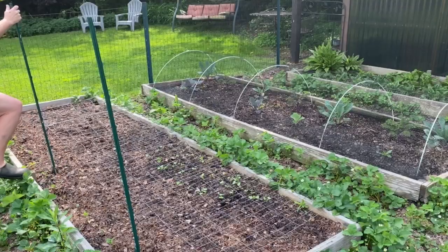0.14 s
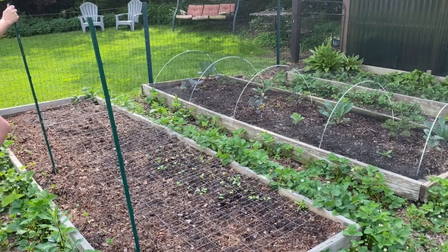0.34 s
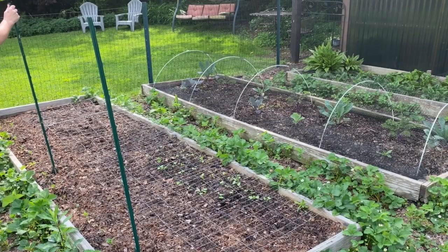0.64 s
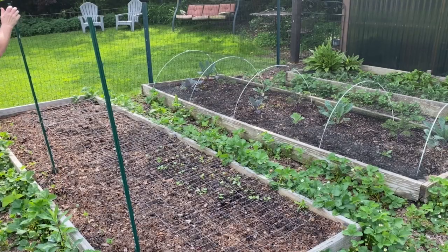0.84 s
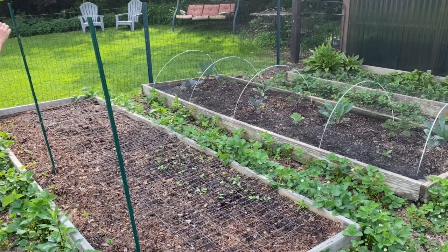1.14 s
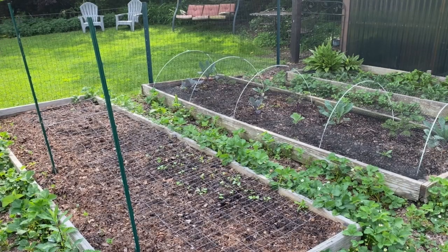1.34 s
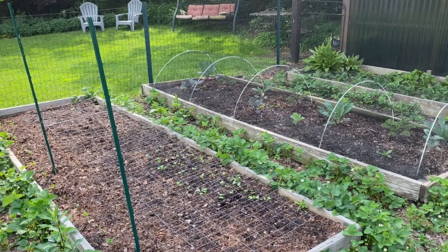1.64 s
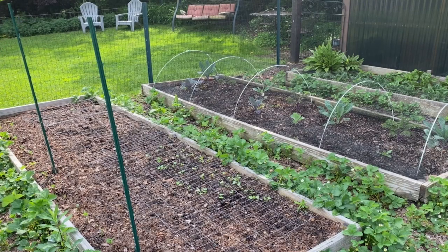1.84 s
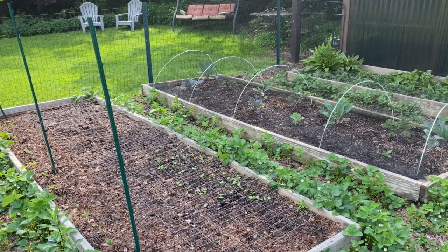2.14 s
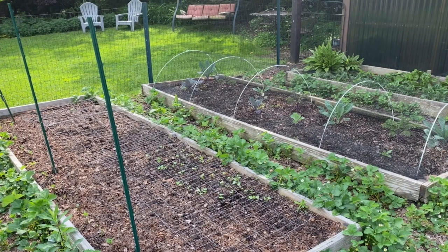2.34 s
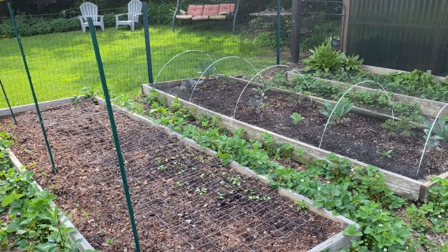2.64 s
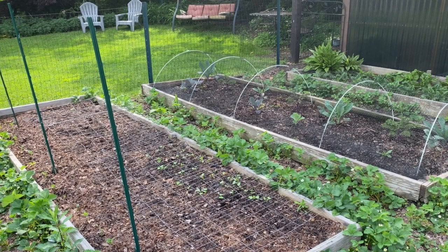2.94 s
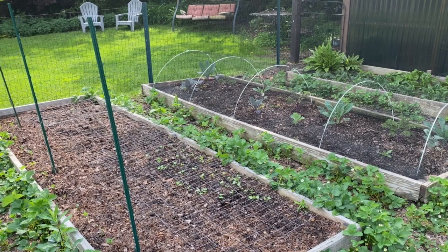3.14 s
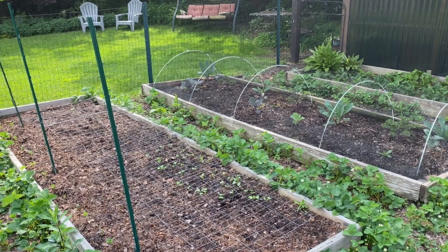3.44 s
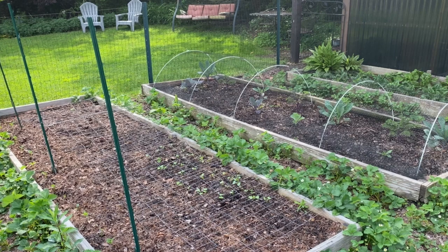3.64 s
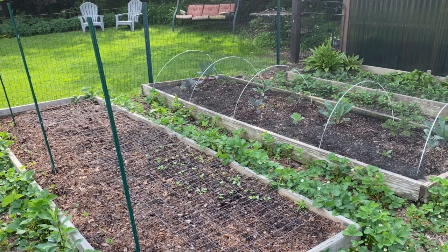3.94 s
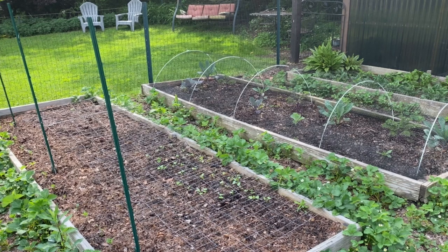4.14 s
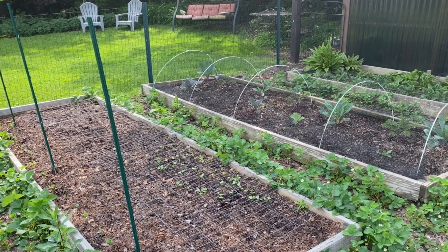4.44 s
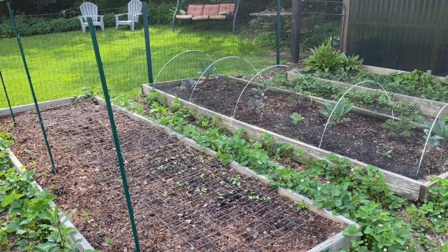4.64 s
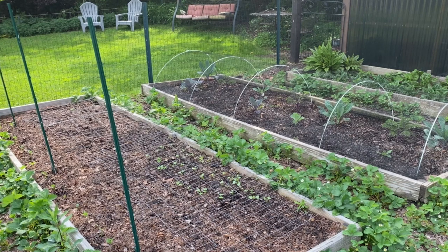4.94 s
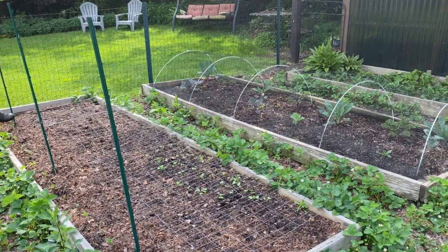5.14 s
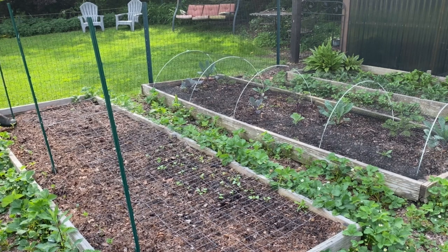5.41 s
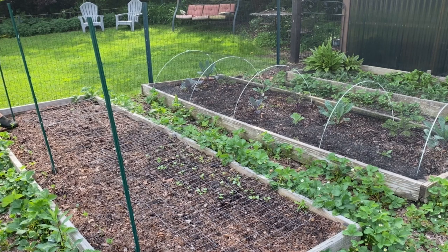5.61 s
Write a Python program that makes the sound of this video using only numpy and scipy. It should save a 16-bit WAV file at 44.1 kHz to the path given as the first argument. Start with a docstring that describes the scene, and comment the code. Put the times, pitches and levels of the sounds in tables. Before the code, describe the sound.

A deep steady drone fills a garden while wrens, sparrows and other songbirds chatter; a foot bumps timber softly near the start.

```python
"""Birds over a humming garden

A wren twitters and trills, a warbler rolls a phrase, sparrows chirp and a songbird whistles falling notes:
all gliding sines, each with a weak overtone and scattered echoes from trees and a shed wall.
A foot bumps a wooden bed edge (short puffs of noise); a faint grainy treble hiss (noise) comes and goes.
A machine hums low (wavering sines over rumble noise) in open air (broad noise); at 3.931 s a quick crossfade
swaps hum and air for another pair, the hum lower in pitch, and the hiss stops."""
import sys
import numpy as np
from scipy import signal
from scipy.fft import rfft, irfft, next_fast_len
from scipy.io import wavfile
from scipy.ndimage import uniform_filter1d, map_coordinates

SR = 44100
rng = np.random.default_rng(int(sys.argv[2]) if len(sys.argv) > 2 else 0)


def digitize_waveform(pressure):
    """Quantize a signal to 16-bit integers and store it at the path in sys.argv[1].

    Rows of a 2-D input are taken as channels; values are limited to [-1, 1].
    """
    field = np.atleast_2d(pressure).T
    bounded = np.clip(field, -1, 1)
    quanta = np.round(bounded * 32767).astype(np.int16)
    wavfile.write(sys.argv[1], SR, quanta)


N = 254607
CHANGE_S = 3.931  # the hum and air change, the treble hiss stops

# Wren's single notes: (time [s], syllable, pitch ratio, level before the perch gain [dB])
WREN_NOTES = [(0.59, "tick", 1.02, -30), (0.65, "tick", 0.99, -29.5), (.709, "slur", 1.01, -27.5),
              (0.778, "lift", 1.02, -37), (0.904, "nick", 1.02, -31), (0.997, "lift", 0.88, -28)]
# Its two-note seesaw: (time within the motif [s], syllable, relative level [dB])
SEESAW_MOTIF = [(0, "see", -3.5), (.012, "saw", 1)]
# Its two-note trill: (time within the motif [s], syllable, relative level [dB])
TRILL_MOTIF = [(0, "lead", -7.5), (.013, "drop", .5)]


def wren():
    """A seesaw that grows louder, a fast trill that softens, and single twitters, all from one syrinx."""
    seesaw = repeated(SEESAW_MOTIF, start_s=.074, period_s=.119, count=4, level_db=-37.0, grow_db=1.8)
    trill = repeated(TRILL_MOTIF, start_s=.9935, period_s=.0498, count=9, level_db=-26.0, grow_db=-0.38)
    notes = seesaw + trill + WREN_NOTES
    return amp(1.5) * bird(notes, pan_db=-1.5, lag_ms=.41, echo_db=-2.5, rough=0.012, overtone_db=-54.5)


# Warbler's accented notes: (time [s], syllable, pitch ratio, level before the perch gain [dB])
WARBLER_ACCENTS = [(1.556, "flick", 0.99, -27.5), (1.706, "nick", 0.9, -29), (1.853, "nick", .85, -35),
                   (2.158, "nick", 0.83, -34)]
# Its rolled motif: (time within the motif [s], syllable, relative level [dB])
ROLL_MOTIF = [(0, "buzz", -3), (.074, "dip", -1), (.103, "flick", 1.5)]


def warbler():
    """A rolled motif repeats at an even pace, sinking slightly in pitch, with accents among the repeats."""
    roll = repeated(ROLL_MOTIF, start_s=1.449, period_s=.1493, count=5, level_db=-32, grow_db=-0.17,
                    sag=0.0109)
    notes = roll + WARBLER_ACCENTS
    return amp(2.0) * bird(notes, pan_db=-5.0, lag_ms=.4, echo_db=-5.0, rough=0.024, overtone_db=-49)


# Near sparrow's notes: (time [s], syllable, pitch ratio, level before the perch gain [dB])
NEAR_SPARROW_NOTES = [(1.011, "squeal", 1.055, -33), (3.37, "cheep", 0.99, -28),
                      (3.931, "chip", 1.03, -24.5), (4.776, "hoop", 0.98, -53),
                      (5.271, "hoop", 0.97, -44.5), (5.306, "hoop", 1.01, -47), (5.551, "lift", 0.72, -36),
                      (5.56, "lift", .75, -33.5), (5.576, "drop", 1, -31.5)]


def near_sparrow():
    """Fairly dry calls, some with two voices sounding at once, among plain glides."""
    return amp(2.5) * bird(NEAR_SPARROW_NOTES, pan_db=4.0, lag_ms=.39, echo_db=-6.0, rough=0.013,
                           overtone_db=-55.5)


# Far sparrows' notes: (time [s], syllable, pitch ratio, level before echo and chirp shaping [dB])
FAR_SPARROW_NOTES = [(1.063, "chirp", 0.98, -24), (1.543, "chirp", 1.05, -28.5), (1.585, "drop", .8, -30),
                     (1.612, "drop", 0.49, -34), (1.967, "chirp", 1.1, -28.5), (2.016, "drop", .72, -31),
                     (2.032, "drop", 0.62, -34), (3.045, "upstroke", 1.05, -33),
                     (3.069, "downstroke", 1, -29.5), (3.106, "tail", 1, -32.5),
                     (3.122, "dip", 1.02, -37.5), (4.281, "chirp", 1.02, -26.5),
                     (4.347, "upstroke", 0.75, -33), (4.919, "upstroke", .95, -36),
                     (4.941, "crown", .92, -31), (4.955, "drop", .76, -39), (4.96, "upstroke", 1.03, -32),
                     (4.969, "upstroke", .88, -31), (4.978, "downstroke", .95, -30),
                     (5.631, "chirp", 1.05, -27), (5.741, "chirp", 1.03, -25)]


def far_sparrows():
    """Chirps of four strokes with a clear overtone, and loose single strokes."""
    return bird(strokes(FAR_SPARROW_NOTES), pan_db=4.0, lag_ms=-.05, echo_db=-4.0, rough=0.015,
                overtone_db=-25.0)


# The songbird's motif: (time within the motif [s], syllable, relative level [dB])
WHISTLE_MOTIF = [(0, "swoop", -1), (.134, "hold", -3)]


def whistling_songbird():
    """Three steady whistles that fall and hold, each louder; the weak overtone is the fourth harmonic."""
    whistles = repeated(WHISTLE_MOTIF, start_s=4.846, period_s=.4052, count=3, level_db=-26, grow_db=1.3)
    return bird(whistles, pan_db=-3.0, lag_ms=0.45, echo_db=-3.5, rough=0.0012, overtone_db=-32.0, order=4)


# Songbird on the left: (time [s], syllable, pitch ratio, level before echo and panning [dB])
LEFT_SINGER_NOTES = [(4.195, "arch", 0.97, -36), (4.231, "dip", .88, -35), (4.255, "crest", 0.96, -33),
                     (4.357, "crest", .89, -35.5), (4.795, "fall", 0.99, -37.5),
                     (4.861, "plunge", 0.97, -38)]


def left_singer():
    """A short phrase of clear, nearly pure glides, earlier and louder on the left."""
    return bird(LEFT_SINGER_NOTES, pan_db=8.5, lag_ms=-0.33, echo_db=-7.5, rough=.005, overtone_db=-36)


# One clean peep: (time [s], syllable, pitch ratio, level before echo and panning [dB])
PEEP_NOTE = [(2.155, "peep", 1, -30)]


def close_peep():
    """One falling, almost pure tone from close by, with little echo."""
    return bird(PEEP_NOTE, pan_db=-5.0, lag_ms=.4, echo_db=-7, rough=.002, overtone_db=-50)


# Sparrows deep in the trees: (time [s], syllable, pitch ratio, level before the perch gain [dB])
HIDDEN_SPARROW_NOTES = [(1.985, "chirp", 0.87, -38), (3.095, "chirp", 0.8, -41.5),
                        (3.698, "buzz", 1.58, -41), (3.722, "buzz", 1.2, -42), (3.935, "chip", 0.79, -27),
                        (4.3, "chirp", 1.2, -47.5), (4.905, "chirp", 1.2, -39.5),
                        (5.405, "chirp", 0.69, -40.5), (5.61, "chirp", 1.22, -43)]


def hidden_sparrows():
    """Hoarse calls whose scattered sound outweighs the direct sound."""
    return amp(3.0) * bird(strokes(HIDDEN_SPARROW_NOTES), pan_db=11, lag_ms=.1, echo_db=7.0, rough=0.052,
                           overtone_db=-20.5)


# Distant birds' notes: (time [s], syllable, pitch ratio, level before the perch gain [dB])
DISTANT_NOTES = [(.012, "fall", 1.13, -41.5), (.022, "pip", 1.04, -39.5), (.05, "fall", 1.12, -41),
                 (.078, "fall", 1.01, -43.5), (.064, "bow", 0.99, -45), (.248, "pip", 0.96, -40.5),
                 (.272, "sigh", 1, -42), (.395, "buzz", 2, -39.5), (.505, "peep", 0.59, -42.5),
                 (.53, "buzz", 2.02, -41.5), (.55, "fall", 1.04, -42.5), (.712, "rise", 0.98, -43.5),
                 (.847, "upstroke", 0.7, -37), (.872, "fall", 1.46, -40.5), (.925, "pip", 0.94, -40.5),
                 (1.04, "hold", 0.88, -42.5), (1.122, "scoop", 1.1, -40), (1.215, "quaver", 0.99, -43),
                 (3.14, "pip", 1.12, -48.5), (3.662, "fall", 2.02, -44.5), (3.98, "pip", 0.99, -47),
                 (4.078, "fall", 1.3, -47), (4.233, "slur", 0.86, -43.5), (4.248, "fall", 2, -44),
                 (4.26, "pip", 1.56, -50.5), (4.63, "crest", 1.01, -45.5), (4.675, "sigh", 0.79, -49.5),
                 (4.83, "arch", 1.15, -48), (5.405, "buzz", 1.1, -47), (5.44, "buzz", 1.1, -49),
                 (5.675, "hold", 1.075, -37)]
# A thin call: (time within the motif [s], syllable, relative level [dB])
THIN_MOTIF = [(0.0048, "hold", 0)]


def distant_birds():
    """Soft notes washed in echo, and a thin high call repeated at an even pace."""
    thin = repeated(THIN_MOTIF, start_s=1.41, period_s=.192, count=4, level_db=-51, grow_db=0.0,
                    ratio=2.8, sag=0.013)
    return amp(4.5) * bird(DISTANT_NOTES + thin, pan_db=-0.5, lag_ms=0.029, echo_db=2.0, rough=0.013,
                           overtone_db=-31)


def birds():
    """Sum of all perches."""
    return (wren() + warbler() + near_sparrow() + far_sparrows() + hidden_sparrows()
            + whistling_songbird() + left_singer() + close_peep() + distant_birds())


def repeated(motif, start_s, period_s, count, level_db, grow_db, ratio=1, sag=0):
    """A motif sung at an even pace; each repeat changes by grow_db and sinks by the share sag of its pitch."""
    notes = []
    for k in range(count):
        for s, name, db in motif:
            time_s = start_s + k * period_s + s
            notes.append((time_s, name, ratio * (1 - sag * k), level_db + grow_db * k + db))
    return notes


# Strokes of a sparrow's chirp: (time within the chirp [s], syllable, relative level [dB])
CHIRP_STROKES = [(0, "upstroke", -2.5), (.008, "crown", -5), (.025, "downstroke", -0.5),
                 (.06, "tail", -7.5)]


def strokes(notes):
    """Each chirp is sung as four quick strokes; other notes stay whole."""
    whole_note_offset = (0.0005, 0.0055)  # (s, dB)
    sung = []
    for s, name, ratio, db in notes:
        parts = CHIRP_STROKES if name == "chirp" else [(whole_note_offset[0], name, whole_note_offset[1])]
        sung += [(s + after_s, part, ratio, db + part_db) for after_s, part, part_db in parts]
    return sung


def bird(notes, pan_db, lag_ms, echo_db, rough, overtone_db, order=2):
    """One perch: each note arrives directly, lag_ms later on the left, and by its own scattered paths."""
    out = np.zeros((2, N))
    direct = 1 / np.sqrt(1 + amp(echo_db) ** 2)  # the more echo, the less comes straight
    for s, name, ratio, db in notes:
        note = direct * amp(db) * syllable(name, ratio, rough, overtone_db, order)
        left, right = panned(note, pan_db)
        add(out[0], s + lag_ms / 1000, left)
        add(out[1], s, right)
        add(out, s, amp(echo_db) * echoes(note))
    return out


# Quick vibrato by syllable: (rate [Hz], depth [share of the pitch])
VIBRATO_BY_SYLLABLE = {"buzz": (103.3, 0.065), "crown": (160, 0.032), "downstroke": (95, 0.054),
                       "tail": (100, 0.087), "quaver": (23.9, 0.035)}


def syllable(name, ratio, rough, overtone_db, order):
    """The syrinx sounds a gliding sine with one weak overtone; pitch and strength quiver with roughness."""
    if name == "swoop":
        pitch, strength = swoop()
    elif name in CALL_PITCH:
        pitch, strength = call(name)
    else:
        pitch, strength = glide(name)
    t = np.arange(len(pitch)) / SR
    pitch = ratio * pitch * (1 + rough * wobble(507.5, size=len(t)))
    if name in VIBRATO_BY_SYLLABLE:
        rate_hz, depth = VIBRATO_BY_SYLLABLE[name]
        pitch = pitch * (1 + depth * np.sin(2 * np.pi * rate_hz * t))
    phase = 2 * np.pi * np.cumsum(pitch) / SR
    tone = np.sin(phase) + amp(overtone_db) * np.sin(order * phase)
    if name in CALL_VOICING:  # the other side of the syrinx sings along, 1645 Hz higher
        tone = tone + amp(CALL_VOICING[name][-1]) * np.sin(phase + 2 * np.pi * 1645 * t)
    quiver = amp(60 * rough * wobble(300, size=len(t)))
    return strength * quiver * tone


# Plain syllables before the pitch ratio:
# (length [s], start [Hz], middle [Hz], end [Hz], loudest moment [share of the length])
GLIDE_SHAPES = { "see": (.02, 7300, 6800, 6250, .4), "saw": (.022, 4550, 5050, 5800, .7),
                "lead": (.015, 5000, 5750, 6850, .5), "drop": (.013, 6700, 4850, 3650, .5),
                "nick": (.015, 4250, 4650, 5250, .45), "tick": (.013, 5700, 4650, 4650, .5),
                "hoop": (.04, 4400, 5500, 4450, .45), "plunge": (.024, 3150, 2300, 2100, .35),
                "scoop": (.04, 2100, 2080, 2450, .4), "quaver": (.15, 2860, 2810, 2620, .45),
                "slur": (0.021, 7100, 5200, 4450, 0.14), "lift": (0.032, 6500, 7300, 7500, 0.23),
                "buzz": (0.045, 2570, 2670, 2390, 0.53), "dip": (.016, 3450, 2950, 2750, .4),
                "flick": (.028, 3600, 3950, 3950, .35), "hold": (0.068, 2530, 2605, 2540, 0.38),
                "pip": (.045, 4320, 4240, 4210, .35), "crest": (.062, 2270, 2410, 2330, .5),
                "bow": (.095, 2780, 3110, 2720, .6), "fall": (.045, 2340, 2230, 2120, .5),
                "peep": (.03, 5400, 5260, 5080, .4), "upstroke": (.011, 3250, 4150, 4950, .45),
                "crown": (.02, 4700, 4850, 4800, .4), "downstroke": (.023, 4550, 3880, 3950, .4),
                "tail": (.024, 3150, 3650, 3050, .45), "arch": (.054, 2250, 2860, 2480, .62),
                "sigh": (.115, 3050, 2840, 2720, .55), "rise": (.11, 2500, 2780, 3350, .8), }


def glide(name):
    """A plain syllable bends through three pitches while it swells and fades."""
    length, start_hz, middle_hz, end_hz, loudest = GLIDE_SHAPES[name]
    u = np.linspace(0, 1, int(length * SR))
    bend = np.polyfit([0, .5, 1], [start_hz, middle_hz, end_hz], 2)
    return np.polyval(bend, u), swell(length, loudest)


# Pitch of the two-voiced calls before smoothing and pitch ratio: (time after the start [s], pitch [Hz])
CALL_PITCH = { "cheep": [(0, 1800), (.007, 2450), (.014, 5400), (.02, 6700), (.04, 7100), (.048, 5450),
              (.057, 5200), (.068, 6400), (.081, 4650), (.089, 2300), (.096, 1950)], "squeal": [(0, 5600),
              (.006, 6650), (.022, 7350), (.028, 6150), (.04, 6700), (.052, 6300)], "chip": [(0, 5400),
              (.004, 5530), (.009, 6370), (.015, 5050), (.03, 3540)], }
# Voicing of those calls: (throat resonance [Hz], fade [dB/s], time between strokes [s],
# dip between strokes [dB], second voice [dB])
CALL_VOICING = { "cheep": (5400, -35, .027, 7, -7), "squeal": (6700, 0, .024, 3, 0),
                "chip": (5300, 200, .013, 4, -9), }


def call(name):
    """A call is pushed out in strokes and loses level as its pitch leaves the throat's resonance."""
    throat_db_per_oct, edge_s = 12, .001
    s, hz = np.transpose(CALL_PITCH[name])
    throat_hz, fade_db_per_s, stroke_s, dip_db, _ = CALL_VOICING[name]
    t = np.arange(int(s[-1] * SR)) / SR
    pitch = uniform_filter1d(np.interp(t, s, hz), size=130)
    edges = np.clip(np.minimum(t, t[-1] - t) / edge_s, 0, 1)
    effort_db = -fade_db_per_s * t - dip_db * np.sin(np.pi * t / stroke_s) ** 2
    throat_loss_db = throat_db_per_oct * np.abs(np.log2(pitch / throat_hz))
    return pitch, edges * amp(effort_db - throat_loss_db)


# Falling whistle: (length [s], upper pitch [Hz], lower pitch [Hz], time on the upper pitch [s],
# slide time constant [s], loudest moment [share of the length])
SWOOP_SHAPE = (.112, 2600, 2110, .021, .025, .58)


def swoop():
    """The falling whistle lingers on its upper pitch, slides down and levels out on the lower."""
    length, upper_hz, lower_hz, linger_s, slide_s, loudest = SWOOP_SHAPE
    t = np.arange(int(length * SR)) / SR
    height = np.exp(-(np.maximum(t - linger_s, 0) / slide_s) ** 1.3)
    return lower_hz + (upper_hz - lower_hz) * height, swell(length, loudest)


def swell(length, loudest):
    """Strength of a note that swells to its loudest moment and fades."""
    u = np.linspace(0, 1, int(length * SR))
    turn = np.interp(u, [0, np.clip(loudest, .05, .95), 1], [0, .5, 1])
    return np.abs(np.sin(np.pi * turn)) ** .75  # a larger exponent makes a more pointed swell


# Decay of the garden's echo tail: (frequency [Hz], t60 [s])
GARDEN_DECAY = [(500, 0.09), (2500, 0.8), (5000, 0.63), (9000, 0.27)]


def echoes(note, early_db=7, early_s=0.012, build_s=0.0025):
    """The garden scatters a note: dense early echoes off beds and shed, then a thin tail from the trees."""
    hz, t, z = signal.stft(rng.standard_normal((2, SR // 2)), SR, nperseg=256)
    decay = amp(-60 * t / along(GARDEN_DECAY, hz)[:, None])
    tail = signal.istft(z * decay, SR, nperseg=256)[1]
    t = np.arange(tail.shape[1]) / SR
    early = 1 + amp(early_db) * np.exp(-t / early_s)
    build = 1 - np.exp(-t / build_s)
    tail = tail * early * build
    return signal.fftconvolve(note[None], tail / np.linalg.norm(tail[0]), axes=1)


# A foot on the bed's timber, mulch and grass:
# (time [s], level before the attack [dB], centre [Hz], t60 [s], attack time constant [s])
FOOT_CONTACTS = [(0.56, -25, 343, 0.05, 0.0017), (0.579, -26.5, 11100, 0.011, 0.0013),
                 (.921, -29.5, 358, 0.057, 0.0012), (4.87, -51.5, 7340, 0.67, 0.031),
                 (5.076, -41.5, 6860, 0.33, 0.076), (5.353, -50, 7800, 0.18, 0.0045)]


def steps(width=0.19):
    """Each contact is a puff of noise around one pitch: dull on timber, crisp on mulch."""
    out, t = np.zeros((2, N)), np.arange(N) / SR
    for s, db, centre_hz, t60, attack_s in FOOT_CONTACTS:
        # a bell around the centre; width is in natural log of frequency
        band = lambda hz: np.exp(-(np.log((hz + 1) / centre_hz) / width) ** 2 / 2)
        puff = unit(filtered(rng.standard_normal(N), band))
        add(out, s, puff * amp(db - 60 * t / t60) * (1 - np.exp(-t / attack_s)))
    return out


# Higher hum: (time [s], level [dB])
HIGHER_HUM_LEVEL = [(0, -18.5), (.5, -20), (.92, -20.5), (1.25, -17.5), (1.65, -16.5), (1.85, -18),
                    (2.2, -16), (2.6, -17.5), (3.2, -15), (3.6, -13.5), (3.92, -15.5)]
# Its wavering overtones and whines: (frequency [Hz], level before whine_db [dB])
HIGHER_HUM_WHINES = [(163.6, -39), (272, -58.5), (300, -57.5), (756, -56)]
# Its relative rumble spectrum: (frequency [Hz], density [dB per Hz])
HIGHER_HUM_RUMBLE = [(20, -21), (35, -9), (48, 4), (57, 6), (66, 6.5), (100, 4.5), (135, 1), (175, -8),
                     (220, -14), (400, -60)]


def higher_hum():
    """The machine's first drone, at 81.8 Hz."""
    return machine(HIGHER_HUM_LEVEL, hum_hz=81.8, whines=HIGHER_HUM_WHINES, rumble=HIGHER_HUM_RUMBLE,
                   rumble_db=-31.5, whine_db=1, waver_db=3.0, pan_db=-1.1)


# Lower hum: (time [s], level [dB])
LOWER_HUM_LEVEL = [(3.97, -20.5), (4.25, -19), (4.55, -20), (5, -21.5), (5.4, -20.5), (5.75, -22)]
# Its wavering overtones and whines: (frequency [Hz], level before whine_db [dB])
LOWER_HUM_WHINES = [(82.3, -34), (145, -45), (215, -56), (289, -57), (404, -53.5), (754, -57),
                    (1023, -55.5)]
# Its relative rumble spectrum: (frequency [Hz], density [dB per Hz])
LOWER_HUM_RUMBLE = [(20, -35.5), (35, -5), (47, 0.5), (60, 11), (92, 7), (115, 3), (145, 5), (175, -12.5),
                    (220, -12), (400, -57)]


def lower_hum():
    """The machine's second drone, at 70.9 Hz."""
    return machine(LOWER_HUM_LEVEL, hum_hz=70.9, whines=LOWER_HUM_WHINES, rumble=LOWER_HUM_RUMBLE,
                   rumble_db=-31.0, whine_db=-1.5, waver_db=-0.5, pan_db=-.4)


def machine(level, hum_hz, whines, rumble, rumble_db, whine_db, waver_db, pan_db,
            rumble_follows=0.67, overtones_follow=0.54):
    """A drone that slowly swells and sinks, its rumble and lowest overtones with it, under wavering whines."""
    t = np.arange(N) / SR

    def tone(hz, drift):
        """A sine of rms 1 whose phase drifts slowly (drift in radians)."""
        return np.sqrt(2) * np.sin(2 * np.pi * (hz * t + rng.random()) + drift * wobble(4))

    level_db = curve(level)
    swell_db = level_db - np.mean(np.transpose(level)[1])
    sound = amp(level_db) * tone(hum_hz, drift=0.024)
    for hz, db in whines:
        follow_db = (hz < 2.5 * hum_hz) * overtones_follow * swell_db
        whine_level_db = db + whine_db + waver_db * wobble(3.01) + follow_db
        sound = sound + amp(whine_level_db) * tone(hz, drift=0.86)
    rumble_noise = amp(rumble_db + rumble_follows * swell_db) * rush(rumble, patchy_db=-1.5)
    return panned(sound + rumble_noise, pan_db)


# A thin tone that swells once: (time [s], level [dB])
FAR_TONE_LEVEL = [(0, -51), (.3, -56.5), (.8, -54.5), (1.35, -45), (1.8, -62), (4, -60)]


def far_tone(hz=378):
    """A thin sine, slightly wavering in phase, from beyond the garden."""
    phase = 2 * np.pi * hz * np.arange(N) / SR + 0.14 * wobble(5)
    return amp(curve(FAR_TONE_LEVEL)) * np.sqrt(2) * np.sin(phase)


# Rise and fall of the treble hiss before level_db: (time [s], level [dB])
HISS_LEVEL = [(0.05, -59.5), (0.27, -73), (0.52, -54.5), (0.95, -63), (1.2, -57.5), (1.8, -60.5),
              (1.93, -51.5), (2.1, -56), (2.25, -60), (2.68, -60), (3.1, -67.5), (3.45, -57), (3.58, -78.5),
              (3.73, -59.5), (3.82, -86)]
# Relative spectrum of the hiss: (frequency [Hz], density [dB per Hz])
HISS_SPECTRUM = [(1500, 2.5), (4000, 16), (7000, 7.5), (10000, 5.5), (14000, 2.5), (16000, -12)]


def treble_hiss(level_db=11, grain_db=2.0):
    """A faint, finely grained treble noise that comes and goes, then stops at CHANGE_S."""
    grains = unit(amp(grain_db * wobble(250)))
    sounding = np.arange(N) / SR < CHANGE_S
    return amp(curve(HISS_LEVEL) + level_db) * sounding * grains * rush(HISS_SPECTRUM, patchy_db=-4.0)


# Relative spectrum of the air under the higher hum: (frequency [Hz], density [dB per Hz])
FIRST_AIR_SPECTRUM = [(120, -56), (200, -4), (307, -9.5), (344, -13), (372, -11), (738, -9.5), (968, -13),
                      (2400, -22.5), (2730, -22.5), (9000, -48.5), (11700, -68), (19800, -120)]


def first_air():
    """Open air as broad, slightly patchy noise."""
    return amp(-41.5) * panned(rush(FIRST_AIR_SPECTRUM, patchy_db=2.0), pan_db=-0.5)


# Relative spectrum of the air under the lower hum: (frequency [Hz], density [dB per Hz])
SECOND_AIR_SPECTRUM = [(120, -26.5), (200, -2.5), (397, -2.5), (579, -3.5), (1040, -4), (1890, -13),
                       (2850, -14.5), (5100, -29), (6590, -31.5), (12000, -51.5), (15600, -90),
                       (22000, -120)]


def second_air():
    """Open air as broad noise, with milder patches."""
    return amp(-41.0) * panned(rush(SECOND_AIR_SPECTRUM, patchy_db=1.33), pan_db=-1.0)


def background():
    """Machine and open air, crossfaded to the second pair within 10 ms around CHANGE_S."""
    before = higher_hum() + first_air()
    after = lower_hum() + second_air()
    fade = np.clip((np.arange(N) / SR - CHANGE_S) / .01 + .5, 0, 1)
    fade = np.sin(np.pi / 2 * fade) ** 2
    return (1 - fade) * before + fade * after


# Likeness of left and right: (frequency [Hz], correlation)
LEFT_RIGHT_LIKENESS = [(60, .995), (150, .96), (290, .86), (500, -.2), (1000, -.2), (2500, .1), (10000, .1)]


def rush(spectrum, patchy_db):
    """Stereo noise of rms 1 with patches of random gain, near mono in the bass."""
    z = signal.stft(rng.standard_normal((2, N)), nperseg=512)[2]
    field = uniform_filter1d(rng.standard_normal(z.shape[1:]), 6, 0)
    field = uniform_filter1d(field, 14, 1)
    pair = signal.istft(z * amp(patchy_db * unit(field)), nperseg=512)[1][:, :N]

    def mid_side(hz):
        """Spectrum shared between mid and side to give the wanted likeness."""
        turn = np.arccos(np.clip(along(LEFT_RIGHT_LIKENESS, hz), -1, 1)) / 2
        return amp(along(spectrum, hz)) * [np.cos(turn), np.sin(turn)]

    mid, side = filtered(pair, mid_side)
    return unit(np.array([mid + side, mid - side]))


def amp(db):
    """Decibels to gain."""
    return 10 ** (np.asarray(db) / 20)


def unit(x):
    """Scale to rms 1."""
    return x / np.sqrt(np.mean(x ** 2) + 1e-20)


def along(points, hz):
    """(Hz, value) points read on a log frequency axis."""
    f, v = np.transpose(points)
    return np.interp(np.log(hz + 1), np.log(f + 1), v)


def curve(rows):
    """(s, value) rows as one value per sample."""
    return np.interp(np.arange(N) / SR, *np.transpose(rows))


def wobble(rate, size=N):
    """A smooth random curve, rate knots a second."""
    knots = rng.standard_normal(int(size * rate / SR) + 4)
    return map_coordinates(knots, [np.arange(size) * rate / SR])


def filtered(x, response):
    """x times a response of frequency."""
    m = next_fast_len(N + SR // 2)
    return irfft(rfft(x, m) * response(np.fft.rfftfreq(m, 1 / SR)), m)[..., :N]


def add(track, s, sound):
    """Mix a sound into a track from time s."""
    start = int(np.clip(round(s * SR), 0, N - 1))
    track[..., start:start + sound.shape[-1]] += sound[..., :N - start]


def panned(x, pan_db):
    """Left louder than right by pan_db."""
    return x * amp([[pan_db / 2], [-pan_db / 2]])


def scene():
    """Everything heard in the garden."""
    return birds() + steps() + background() + far_tone() + treble_hiss()


def record(dry):
    """A sharp band limit keeps only what lies below 15.6 kHz."""
    return filtered(dry, lambda hz: hz < 15600)


dry = scene()
out = record(dry)
digitize_waveform(out)
```